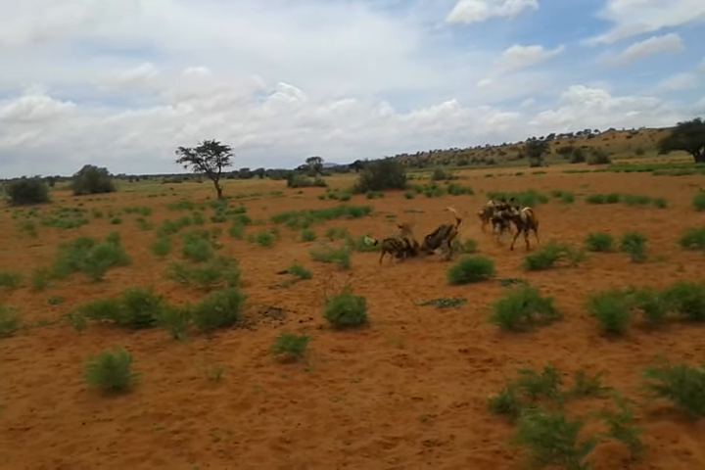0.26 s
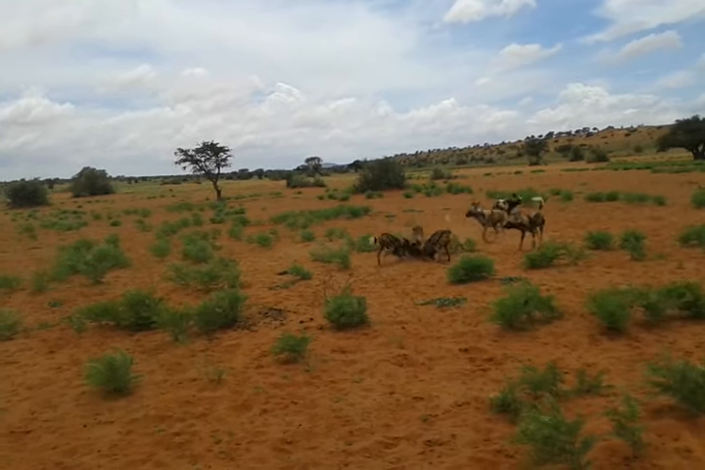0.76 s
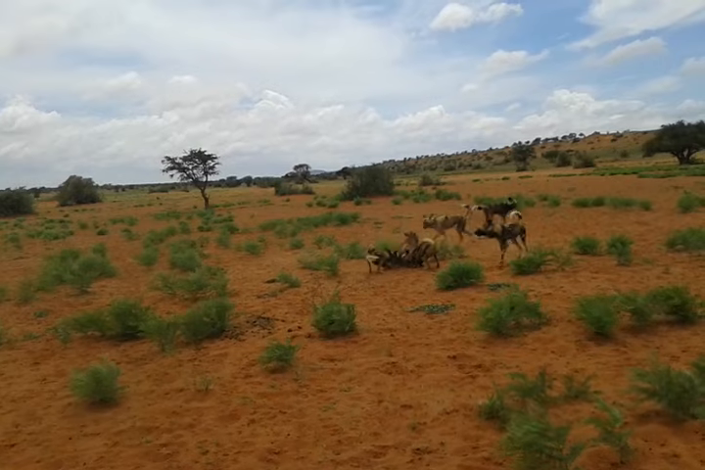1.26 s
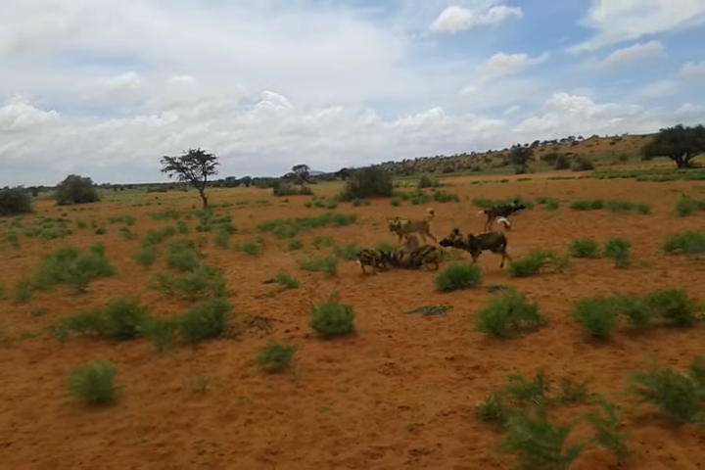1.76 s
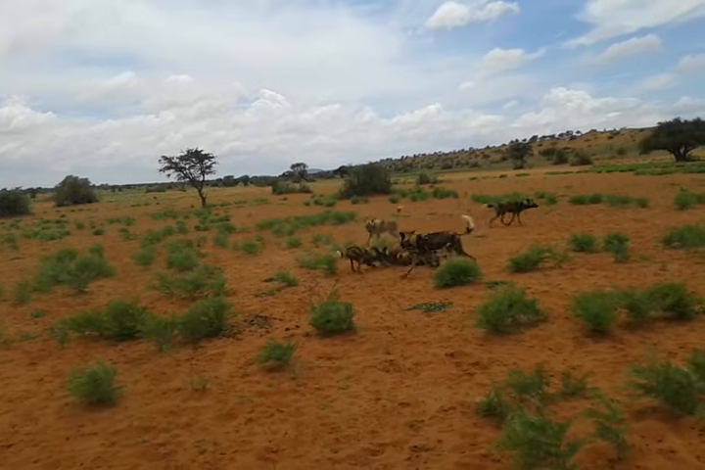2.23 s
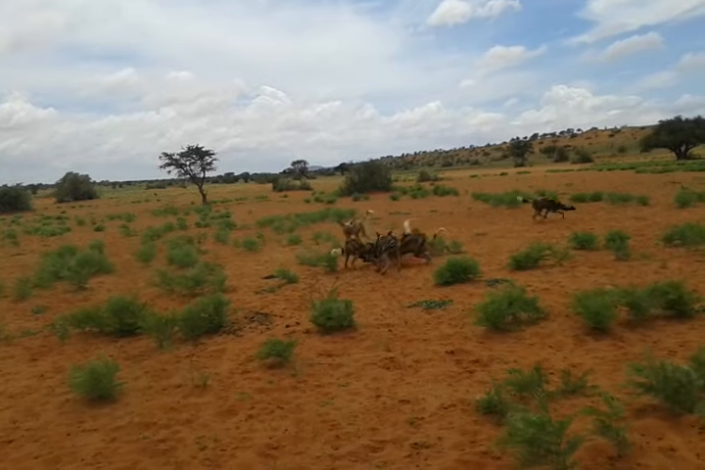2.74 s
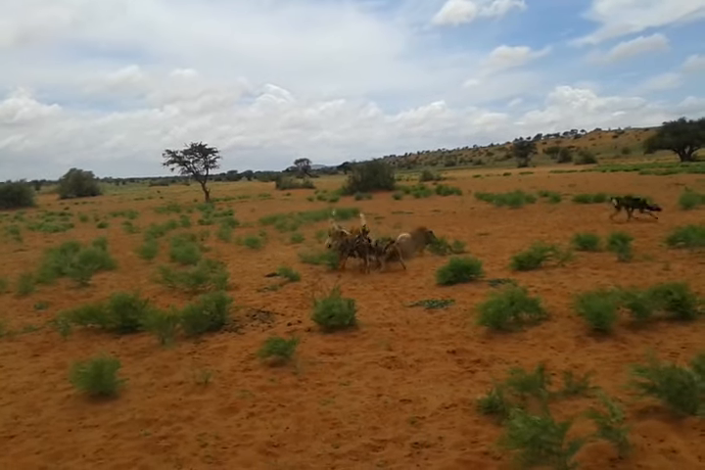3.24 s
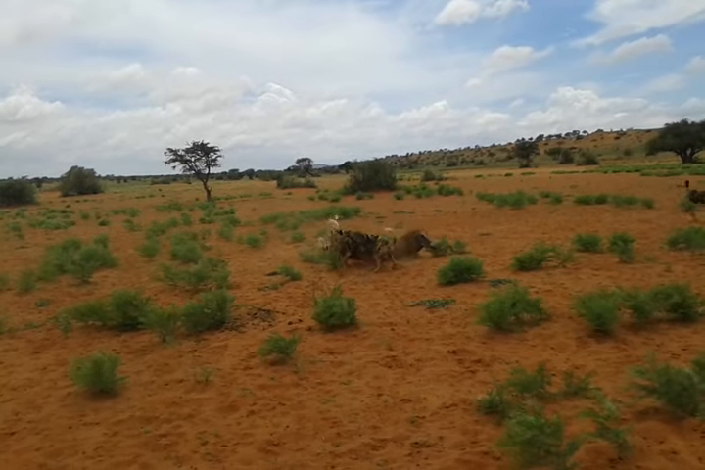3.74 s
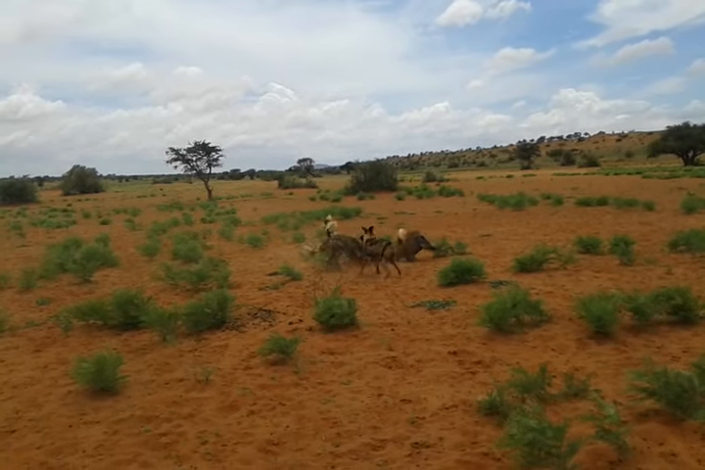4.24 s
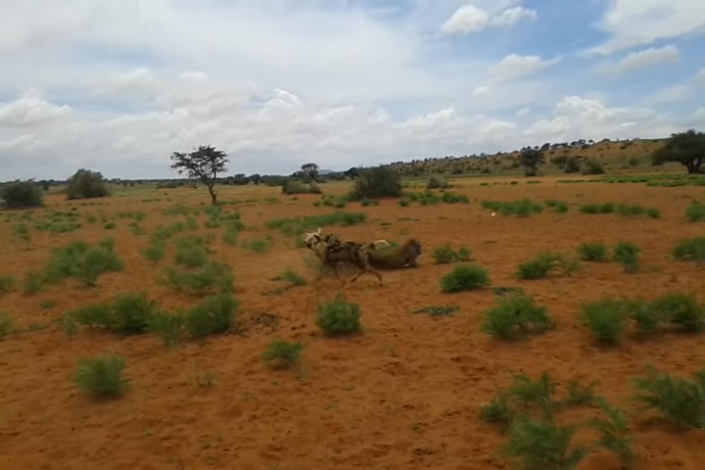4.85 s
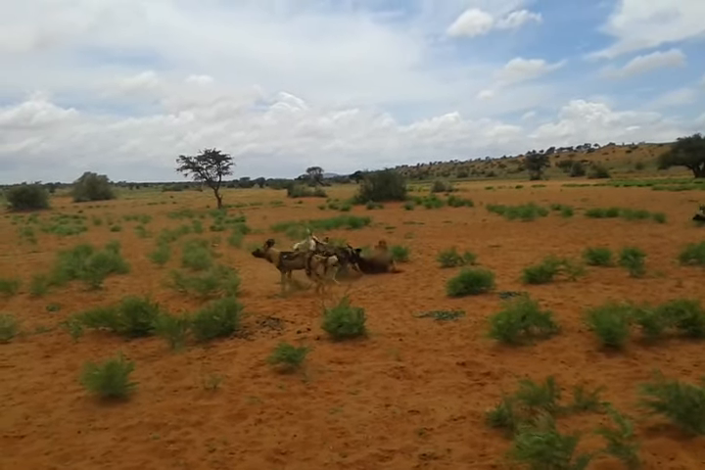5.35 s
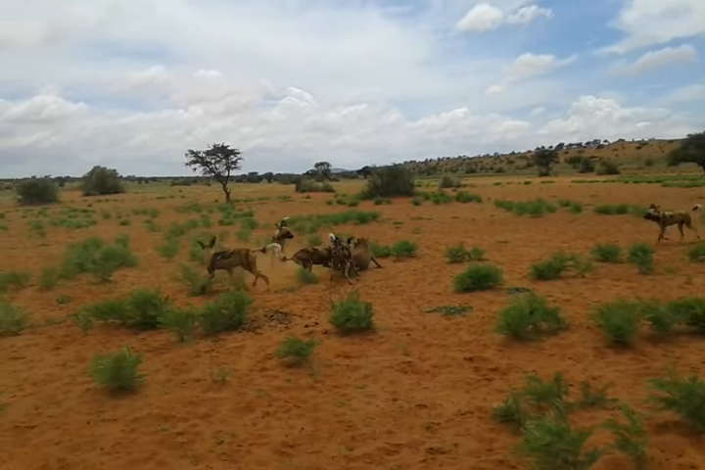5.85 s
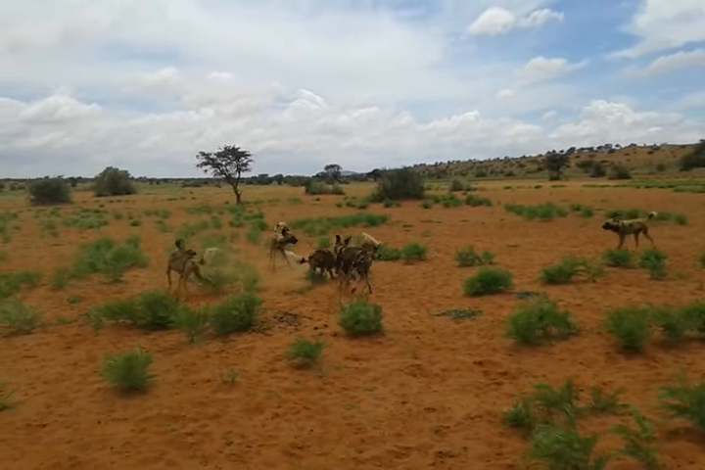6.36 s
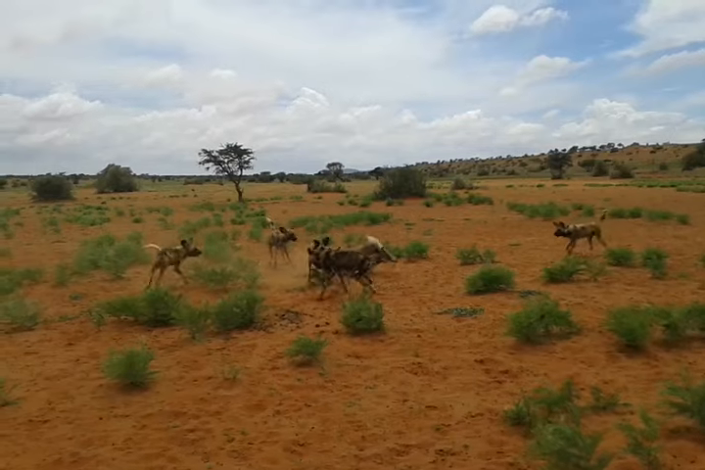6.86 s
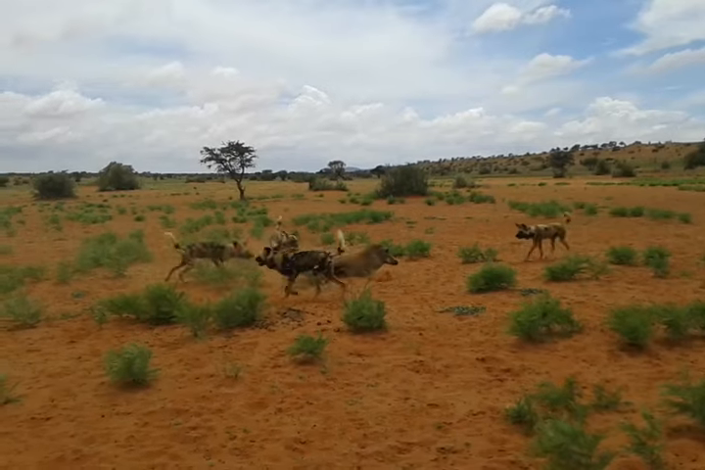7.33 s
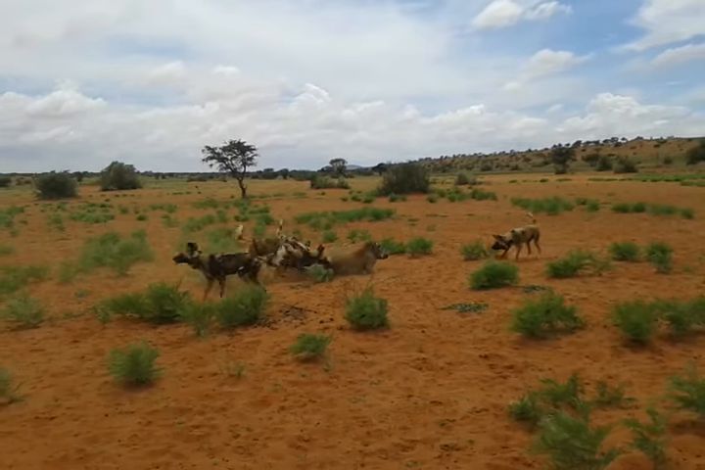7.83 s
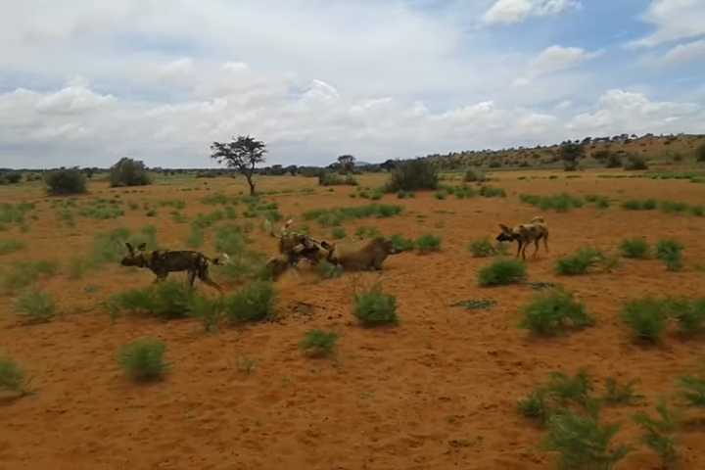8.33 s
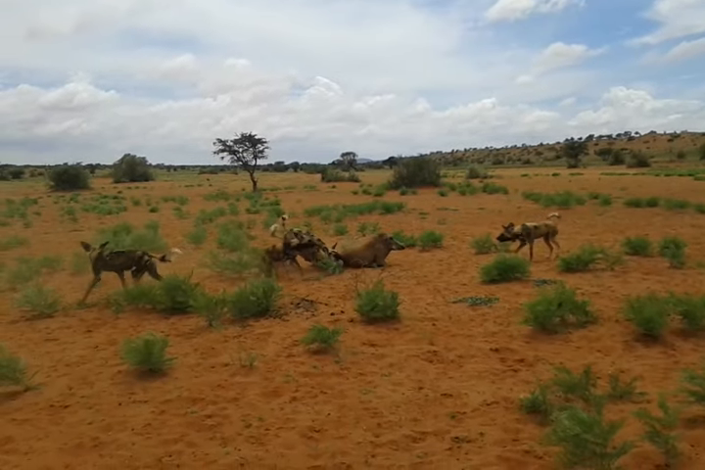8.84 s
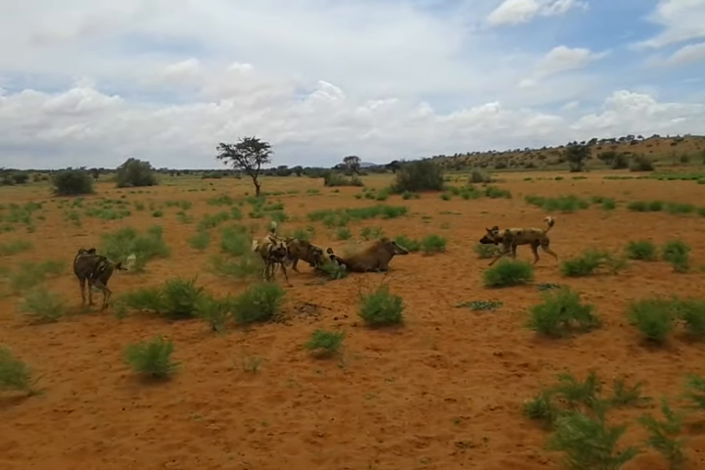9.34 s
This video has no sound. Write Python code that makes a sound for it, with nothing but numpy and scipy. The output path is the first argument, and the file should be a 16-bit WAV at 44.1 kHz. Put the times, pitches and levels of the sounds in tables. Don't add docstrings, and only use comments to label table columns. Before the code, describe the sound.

A warthog held at bay by wild dogs on open scrub grunts from the start, about five times a second: short, guttural slaps, single, double or triple, with a hollow ringing throat and changing mouth shape. Breath puffs follow the harder ones. Low wind rumbles and gusts on the microphone throughout, with a sharp buffet and a twig snap near 4.3 seconds. From about 4.7 to 5.3 the animal squeals once, a fluttering, raspy whistle rising near two kilohertz over a low tone, ending amid the heaviest wind thumps. Grunts resume at 5.4, loudest around 6.5 and 6.9, then 7.8, spreading out after 8. Faint thin chirps come near 1, 3 and 8.8, slight rustles at 2, 6.5 and 9.1, small snaps at 6.2, 8.1 and 9.1. A soft last grunt comes at 9.2, leaving breeze and light hiss. Echoes are short and dull.

```python
import sys
import numpy as np
from scipy import signal
from scipy.fft import rfft, irfft, next_fast_len
from scipy.io import wavfile
from scipy.ndimage import uniform_filter1d

SR = 44100
rng = np.random.default_rng(int(sys.argv[2]) if len(sys.argv) > 2 else 0)


def bounce(signal):
    frames = np.transpose(np.atleast_2d(signal))
    limited = np.clip(frames, -1, 1)
    pcm = np.round(limited * 32767).astype(np.int16)
    wavfile.write(sys.argv[1], SR, pcm)


def decibels_to_gain(level_db):
    exponent = np.asarray(level_db, float) / 20
    return 10 ** exponent


N = 422919
TIME = np.arange(N) / SR

# f/Hz, level/dB, t60/s
TRACT = [(411.4, -5.5, 0.082), (526, -7.5, 0.062), (695.4, 2.5, 0.11), (944, 1.5, 0.067),
         (1160, 4.5, 0.039), (1486, -1, 0.061), (1890, -1.5, 0.056), (2270, -3.5, 0.052),
         (2600, -5.5, 0.052), (3008, -3, 0.052), (3400, -5.5, 0.048), (3770, -6.5, 0.049),
         (4600, -14, 0.035), (5300, -18, 0.03)]
# t/s, length/s, first pulse level/dB, swell to last pulse/dB, mouth level re first pulse/dB
NARROW = [(0.128, 0.026, -38.5, -7.5, -24.5), (0.686, .021, -29, 4, -21), (1.306, .026, -34.5, 3.5, -15),
          (1.416, 0, -52, 0, -3.5), (1.503, 0, -33, 0, -20), (1.53, .023, -27, 1, -20),
          (1.556, .024, -31, -1, -26), (6.451, 0, -28, 0, -22), (1.97, .056, -40, -3, -17),
          (2.438, 0.05, -41.5, 4, -12.5), (5.454, 0, -35.5, 0, -13), (7.532, 0, -42.5, 0, -27),
          (8.276, 0, -29, 0, -24)]
ROUND = [
    (0.889, .026, -30.5, -1, -17),
    (2.047, .022, -52, 0, -3),
    (8.545, 0, -54, 0, -4),
    (2.88, .028, -40, 2.5, -14),
    (3.528, .051, -35, 0, -12),
    (5.835, .028, -32, -1, -8),
    (5.929, 0, -44, 0, -4),
    (6.48, 0, -20, 0, -17),
    (6.266, .029, -30.5, -5.5, -14),
]
WIDE = [
    (0.296, .033, -41, 1.5, -17),
    (1.113, .021, -43, 7.5, -12.5),
    (1.73, .031, -34, -8.5, -19.5),
    (3.083, .031, -42, 4, -7),
    (3.321, .026, -40, -3, -11),
    (8.062, .056, -44, 5, -15.5),
]
GAPING = [
    (5.427, 0, -28, 0, -22),
    (5.618, .026, -32, -2, -5),
    (6.888, .028, -19, -5, -18),
]
RAISED = [
    (6.032, .024, -38, 10, -13),
    (7.764, .028, -22, -7.5, -18),
]
FALSE_STARTS = [
    (3.665, 0, -46, 0, -12),
    (0.867, 0, -54, 0, -17),
    (4.412, 0, -45, 0, -10),
    (4.642, 0, -47, 0, -17),
    (5.405, 0, -38.5, 0, -27),
    (6.658, 0, -38, 0, -26),
    (6.865, 0, -51, 0, -10),
    (7.734, 0, -50, 0, -12),
]
TENSE = [
    (2.669, 0, -31.5, 0, -19),
    (3.934, .028, -39, 2.5, -12),
    (4.218, 0, -38.5, 0, -13),
    (4.437, .031, -30, -4, -16),
    (4.659, .052, -31, -12, -17),
    (6.432, .023, -37.5, 13, -15),
    (9.122, .021, -46, 6, -20),
]
NASAL = [
    (4.258, 0, -32, 0, -26),
    (6.681, .025, -24, -7, -25),
    (9.19, 0, -42, 0, -24),
]
PINCHED = [
    (0.511, 0, -39, 0, -25),
    (7.108, .029, -39, 0.5, -17),
    (7.317, .024, -40.5, 2, -14),
]
CLOSING = [
    (0.726, 0, -30, 0, -10),
    (1.047, 0, -50, 0, -2),
    (8.335, 0, -48, 0, -6),
    (2.7, 0, -50, 0, -8),
    (5.474, 0, -36, 0, -4),
    (5.671, 0, -31, 0, -6),
    (6.085, 0, -45, 0, -3),
    (6.728, 0, -47, 0, -4),
    (8.309, 0, -49, 0, -4),
]
# grunts, mouth f/Hz, snout f/Hz, snout level re mouth/dB
MOUTH_SHAPES = [
    (NARROW, 700, 1430, -4),
    (ROUND, 935, 1530, -6),
    (WIDE, 890, 2750, -1),
    (GAPING, 1150, 1900, -7),
    (RAISED, 945, 1950, -3),
    (FALSE_STARTS, 680, 1420, -6),
    (TENSE, 930, 1390, 4),
    (NASAL, 700, 1870, 10),
    (PINCHED, 1150, 2750, 6),
    (CLOSING, 694, 1500, -15),
]
PULSE_GAP_S = 0.027
MOUTH_FOLLOWS, MIDDLE_DB = 0.37, 3
# t/s, length/s, level/dB, tilt/(dB per octave), favoured f/Hz
PUFFS = [(0.716, 0.068, -49, -4.5, 1910), (1.53, 0.088, -43.5, -8, 716), (1.981, 0.2, -56, -6.5, 1630),
         (3.548, 0.068, -65, 1.5, 1890), (3.688, 0.086, -50.5, -7.5, 1045),
         (4.203, 0.089, -46.5, -8.5, 2130), (4.432, 0.12, -57.5, -4, 700),
         (5.641, 0.058, -35.5, -11.5, 700), (5.297, 0.13, -56.5, -5, 2010), (6.073, 0.074, -47.5, -9, 700),
         (6.489, 0.06, -39, -2.5, 2620), (6.704, 0.066, -48, -7, 700), (6.922, 0.057, -39, -8, 1900),
         (7.776, 0.074, -43.5, -8, 2180), (8.272, 0.12, -59.5, -6, 3660), (8.399, .2, -56.5, -7.5, 2780),
         (9.115, 0.13, -60, -4, 1400), (2.68, .07, -53, -8, 1900), (2.91, .06, -55, -9, 550),
         (3.125, .055, -54, -8, 2900), (3.35, .05, -56, -8, 3700), (2.49, .05, -54, -9, 700),
         (0.92, .06, -52, -9, 550), (1.135, .05, -54, -8, 2700), (1.335, .05, -52, -9, 550),
         (7.345, .055, -53, -8, 1150), (8.59, .1, -59, -8, 700), (4.705, .06, -52, -8, 700),
         (2.125, .035, -60, -2, 2200)]
GLIDE_SHARE, GLIDE_PER_S = 0.06, 9
# start t/s, end t/s
SQUEAL_SPAN = (4.7, 5.34)
# t/s, f/Hz, level/dB, second partial level/dB
WHISTLE = [
    (4.752, 1655, -49, -49.5),
    (4.815, 1770, -46.5, -43),
    (4.865, 1950, -35.5, -38.5),
    (4.93, 1972, -44, -45.5),
    (5.13, 2050, -36, -58),
    (5.142, 2175, -38, -54.5),
    (5.2, 2145, -35, -55),
    (5.235, 2085, -45, -50.5),
    (5.3, 1940, -43, -62),
]
# t/s, f/Hz, level/dB
LOW_TONE = [
    (4.78, 301, -54),
    (4.815, 420, -37.5),
    (4.86, 372, -43),
    (4.935, 434.4, -51),
    (4.965, 490.6, -41),
    (5.12, 472, -37.5),
    (5.2, 483, -41),
    (5.235, 519, -40.5),
    (5.3, 460, -42.5),
]
# t/s, f/Hz, side lines re partial/dB, own harmonics level/dB
FLUTTER = [
    (4.74, 141, -20, -62),
    (4.84, 140, -19, -62),
    (4.88, 138, -9, -62),
    (4.96, 140, -12, -63),
    (5.02, 139, -20, -63),
    (5.08, 157, -24, -62),
    (5.18, 158, -22, -61),
    (5.23, 172, -20, -55),
    (5.3, 157, -19, -57),
]
# multiple, level/dB
FLUTTER_ORDERS = [(2, 6), (4, -6), (5, 2), (6, -2), (7, -8), (8, -5), (9, -3), (10, 0), (11, -7)]
# f/Hz, level/(dB per Hz)
RASP = [(150, -62), (250, -17.5), (456, -4), (616, -24.5), (763, -12), (1020, -22), (1860, -17),
        (2050, -15.5), (2670, -29.5), (4200, -29.5), (5000, -45), (6500, -62), (11000, -120)]
SCOOP_S, SCOOP_SHARE = 0.027, 0.3
SCOOP_DULL_DB = 30
THIRD_DB, THIRD_FADE_DB_PER_S = -5.5, 9.0
BLUR_DB, BLUR_FOLLOWS = -7.5, 0.64
RASP_DB, RASP_FOLLOWS = -48.5, 0.3
BEAT_DEPTH = 0.2
SIDE_LOSS_DB, BELOW_DB = 3.5, -9
# t/s, peak level/dB
SNAPS = [
    (4.2572, -40),
    (6.2023, -50),
    (8.1179, -46),
    (8.1404, -48),
    (9.0114, -59),
    (9.1242, -48),
    (9.1436, -49),
    (9.191, -42),
]
SNAP_T60_S = 0.03
# t/s, length/s, level/dB
RUSTLES = [
    (1.97, .17, -72),
    (6.47, .06, -70),
    (9.1, .12, -67),
]
# t/s, length/s, start f/Hz, end f/Hz, level/dB
CHIRPS = [
    (1.045, .03, 3700, 3550, -63),
    (3.025, 0.042, 6600, 8000, -62.5),
    (3.272, .025, 8200, 9000, -63.5),
    (8.756, 0.028, 10000, 12600, -62),
    (8.782, 0.031, 5800, 9500, -58),
]
# t/s, level/dB
BREEZE = [(0.0, -58.5), (1.2, -50), (1.7, -58.5), (2.24, -57), (2.33, -72), (3.9, -63), (4.15, -56.5),
          (4.9, -57), (5.7, -45), (6.75, -48.5), (7.05, -66), (7.65, -47), (8.0, -69), (8.6, -46.5),
          (8.86, -54), (9.1, -47), (9.25, -61.5), (9.5, -53.5)]
# peak t/s, level/dB, time to change by 10 dB/s
GUSTS = [(.31, -43, 0.07), (.52, -47.5, .1), (.73, -42.5, 0.04), (.92, -49, 0.07), (1.31, -41.5, 0.08),
         (1.54, -50, 0.12), (2.01, -42, 0.1), (2.49, -39.5, .025), (2.63, -39.5, 0.0843),
         (2.92, -44.5, 0.05), (3.13, -41.5, 0.06), (3.37, -50.5, 0.12), (3.56, -43.5, 0.08),
         (3.97, -47, 0.05), (4.28, -36, .08), (4.51, -42, .08), (4.7, -44, .09), (5.33, -42, .07),
         (5.52, -37, 0.09), (5.899, -32, 0.05), (6.07, -46, 0.02), (6.31, -37, 0.07), (6.47, -41.5, 0.06),
         (6.92, -39.5, .07), (7.13, -44, 0.04), (7.36, -40.5, 0.04), (7.56, -43.5, .15), (7.78, -39.5, .06),
         (8.09, -51.5, 0.08), (8.28, -40, 0.0545)]
# t/s, peak level/dB, f/Hz
THUMPS = [(0.45, -28, 98), (1.289, -31.5, 72.7), (2.579, -38, 107), (4.265, -20.5, 168), (4.279, -24, 125),
          (4.354, -26.5, 116), (4.358, -21, 337), (4.474, -30, 133), (5.266, -17.5, 150), (5.277, -15, 124),
          (5.51, -23, 124), (5.7, -21.5, 120), (5.768, -27, 143), (5.887, -33, 160.2), (6.215, -30, 105),
          (6.298, -34, 140), (6.447, -27, 171), (6.828, -29.5, 86.1), (6.851, -31, 128),
          (7.126, -29.5, 175), (7.344, -34, 172), (7.462, -33.5, 94.5), (7.563, -37, 137),
          (7.755, -27, 160), (8.265, -28, 168), (8.459, -34.5, 102)]
# f/Hz, level/(dB per Hz)
WIND = [(20, -39), (35, -15.5), (50, -10.5), (80, -2), (120, -1.5), (170, -4), (220, -9.5), (300, -16)]
# f/Hz, level/(dB per Hz)
UPPER_WIND = [(150, -49), (220, -8), (330, -1), (500, -10.5), (800, -14), (1500, -26), (3000, -31.5)]
# f/Hz, level/(dB per Hz)
HISS = [(350, -12.5), (600, -8), (641, -18), (1060, -17.5), (1140, -8), (5060, -11), (13400, -11.5),
        (13900, -7.5)]


def rms_one(x):
    return x / np.sqrt(np.mean(x ** 2) + 1e-20)


def in_time(rows):
    s, *columns = np.transpose(rows)
    return [np.interp(TIME, s, column) for column in columns]


def gate(start, end, rise, fall):
    return np.clip((TIME - start) / rise, 0, 1) * np.clip((end - TIME) / fall, 0, 1)


def coloured(points):
    hz, db = np.transpose(points)
    size = next_fast_len(N)
    axis = np.maximum(np.fft.rfftfreq(size, 1 / SR), 1)
    shape = decibels_to_gain(np.interp(np.log(axis), np.log(hz), db, left=-90, right=-90))
    return rms_one(irfft(rfft(rng.standard_normal(size)) * shape, size)[:N])


def filtered(x, order, hz, kind="low"):
    return signal.sosfilt(signal.butter(order, hz, kind, fs=SR, output="sos"), x)


def drift(rate, size=N):
    r = np.exp(-16 * np.pi * rate / SR)
    slow = signal.lfilter([1], [1, -2 * r, r * r], rng.standard_normal(size // 8 + 602))[600:]
    return np.interp(np.arange(size) / 8, np.arange(len(slow)), rms_one(slow - slow.mean()))


def ring(drive, hz, t60):
    r, w = decibels_to_gain(-60 / (t60 * SR)), 2 * np.pi * hz / SR
    return signal.lfilter([0, np.sin(w)], [1, -2 * r * np.cos(w), r * r], drive + 1e-18)


def cycle(hz):
    return 2 * np.pi * np.cumsum(hz) / SR


def fold_slaps():
    rows = []
    for table, mouth_hz, snout_hz, snout_db in MOUTH_SHAPES:
        for start, length, first_db, swell_db, mouth_db in table:
            for place in np.linspace(0, 1, 1 + round(length / PULSE_GAP_S)):
                peak_db = first_db + swell_db * place + 4 * MIDDLE_DB * place * (1 - place)
                upper_db = first_db + mouth_db + MOUTH_FOLLOWS * swell_db * place - peak_db
                at = start + length * place
                rows.append((at, peak_db, upper_db, mouth_hz, upper_db + snout_db, snout_hz))
    return rows


def grunts():
    slaps = fold_slaps()
    rest_hz, level_db, t60 = np.transpose(TRACT)[:, :, None]
    zone = np.searchsorted([600, 1300], rest_hz)
    chance = rng.standard_normal((len(slaps), 3, len(TRACT), 1))
    flutter = np.array([0.18 * drift(70), 0.4 * drift(110), 0.6 * drift(200)])
    crackle = filtered(rng.standard_normal(N), 2, [2400, 5500], "band")
    t = np.arange(int(0.14 * SR)) / SR
    out = np.zeros(N)
    for slap, (detune, vary, phase) in zip(slaps, chance):
        start, peak_db, mouth_db, mouth_hz, snout_db, snout_hz = slap
        hz = rest_hz * (1 + 0.035 * detune)
        for favoured_hz in (mouth_hz, snout_hz):
            hz[np.argmin(np.abs(rest_hz - favoured_hz))] = favoured_hz
        mouth = mouth_db - np.minimum(41.0 * np.abs(np.log2(hz / mouth_hz)), 14)
        snout = snout_db - np.minimum(22.0 * np.abs(np.log2(hz / snout_hz)), 10.5)
        zone_db = np.choose(zone, [0 * hz, mouth, snout])
        gain = decibels_to_gain(peak_db + zone_db + level_db + 0.5 + 2.3 * vary)
        rise = 1 - np.exp(-t * np.sqrt(hz) / 0.05)
        at = int(start * SR)
        span = slice(at, at + len(t))
        rough = 1 + 1.48 * (1 - np.exp(-t / 0.0059)) * flutter[zone[:, 0], span]
        tones = decibels_to_gain(-60 * t / t60) * np.sin(2 * np.pi * hz * t + 0.3 * phase)
        out[span] += np.sum(gain * rise * rough * tones, axis=0)
        out[span] += decibels_to_gain(peak_db + snout_db - 15 - 60 * t / 0.12) * crackle[span]
    return out


def puffs():
    turbulence = rng.standard_normal(N) * decibels_to_gain(2.5 * drift(60))
    modes = [rms_one(ring(ring(turbulence, hz, 0.01), hz, 0.4 * t60)) for hz, _, t60 in TRACT]
    out = np.zeros(N)
    samples = np.arange(float(N))
    warped = np.cumsum(1 + GLIDE_SHARE * drift(GLIDE_PER_S)) % (N - 1)
    for start, length, level_db, tilt_db, favoured_hz in PUFFS:
        span = slice(int(start * SR), int((start + length) * SR))
        shape = gate(start, start + length, 0.011, 0.051)[span]
        for mode, (hz, _, _) in zip(modes, TRACT):
            favour_db = 9 * np.exp(-(np.log2(hz / favoured_hz) / 0.14) ** 2)
            mode_db = level_db - 6.5 + tilt_db * np.log2(hz / 400) + favour_db - 6.0 * (hz > 4000)
            out[span] += shape * np.interp(warped[span], samples, mode) * decibels_to_gain(mode_db)
    return out


def narrow(width_hz, size):
    return rms_one(filtered(rng.standard_normal(size), 5, width_hz))


def side_lines(flutter, side_db):
    n = len(flutter)
    total = 0
    for j in (-1, 1, 2, 3):
        line_db = side_db - SIDE_LOSS_DB * (abs(j) - 1) + BELOW_DB * (j < 0) + 5.0 * drift(25, n)
        total = total + decibels_to_gain(line_db) * np.exp(1j * j * flutter)
    return total


def squeal():
    span = slice(int(SQUEAL_SPAN[0] * SR), int(SQUEAL_SPAN[1] * SR))
    t, n = TIME[span], span.stop - span.start
    high_hz, one_db, two_db = (c[span] for c in in_time(WHISTLE))
    low_hz, low_db = (c[span] for c in in_time(LOW_TONE))
    flutter_hz, side_db, buzz_db = (c[span] for c in in_time(FLUTTER))
    scoop = np.clip((WHISTLE[0][0] - t) / SCOOP_S, 0, 1) ** 0.45
    high_hz = high_hz * (1 - SCOOP_SHARE * scoop)
    two_db = two_db - SCOOP_DULL_DB * scoop
    three_db = two_db + THIRD_DB - THIRD_FADE_DB_PER_S * (t - WHISTLE[2][0])
    blur_db = BLUR_DB - BLUR_FOLLOWS * (one_db + 42.5)
    high = cycle(high_hz * (1 + 0.0052 * drift(37, n)))
    low = cycle(low_hz * (1 + 0.014 * drift(42, n)))
    flutter = cycle(flutter_hz * (1 + 0.025 * drift(30, n)))

    buzz = 0
    for order, db in FLUTTER_ORDERS:
        buzz = buzz + decibels_to_gain(buzz_db + db + 4.0 * drift(20, n)) * np.sin(order * flutter)

    partials_db = [one_db, two_db - 1.5] + [three_db - loss for loss in (3.5, 5, 5.5, 8, 16)]
    clean_db = [0, -1.5, -14, -17, -18, -19, -20]
    width_hz = [130, 190, 330, 430, 520, 600, 650]
    whistle = 0
    for k, db in enumerate(partials_db):
        lines = 1 + (1 + 0.45 * k) * side_lines(flutter, side_db)
        clean = decibels_to_gain(clean_db[k] + 3.0 * drift(30, n)) * np.imag(lines * np.exp(1j * (k + 1) * high))
        blur = decibels_to_gain(blur_db - 1.5) * narrow(width_hz[k], n) * np.sin(1.065 * (k + 1) * high)
        whistle = whistle + decibels_to_gain(db) * (clean + blur)
    whistle = whistle * (1 + BEAT_DEPTH * np.cos(low))

    unsteady = decibels_to_gain(1.7 * drift(50.6, n)) + 0.26 * drift(65, n)
    harmonics = np.sin(low) + 0.11 * np.sin(2 * low) + 0.07 * np.sin(3 * low)
    tone = decibels_to_gain(low_db) * unsteady * harmonics * gate(4.78, 5.305, 0.015, 0.0074)[span]
    rasp_db = RASP_DB - 1.5 + RASP_FOLLOWS * (two_db + 48) + 1.5 * drift(40, n)
    out = np.zeros(N)
    out[span] = np.sqrt(2) * (whistle + buzz + tone) + decibels_to_gain(rasp_db) * coloured(RASP)[span]
    return out * gate(4.724, 5.32, 0.01, 0.03)


def scrub_echo(voice):
    dull = filtered(voice, 1, 2500)
    lags = (SR * np.sort(rng.uniform(0.02, 0.09, 7))).astype(int)
    return sum(decibels_to_gain(-24 - 120 * lag / SR) * np.r_[np.zeros(lag), dull[:-lag]] for lag in lags)


def snaps():
    t, out = np.arange(int(SNAP_T60_S * SR)) / SR, np.zeros(N)
    for start, peak_db in SNAPS:
        decay = decibels_to_gain(peak_db + 0.5 - 60 * t / SNAP_T60_S)
        out[int(start * SR):][:len(t)] += decay * rng.standard_normal(len(t))
    return filtered(out + 1e-18, 3, [600, 3800], "band")


def rustles():
    bright = filtered(rng.standard_normal(N), 2, 3500, "high") * decibels_to_gain(3.0 * drift(80))
    return bright * sum(decibels_to_gain(db) * gate(s, s + length, 0.4 * length, 0.4 * length) for s, length, db in RUSTLES)


def chirps():
    out, waver = np.zeros(N), 1 + 0.04 * drift(300)
    for start, length, start_hz, end_hz, level_db in CHIRPS:
        t = np.arange(int(length * SR)) / SR
        at = int(start * SR)
        span = slice(at, at + len(t))
        hz = (start_hz + (end_hz - start_hz) * (t / length) ** 1.8) * waver[span]
        out[span] += decibels_to_gain(level_db) * np.sin(np.pi * t / length) * np.sin(cycle(hz))
    return out


def gusts():
    coarse = TIME[::32]
    s, db, swell_s = np.transpose(GUSTS)[:, :, None]
    power = np.sum(decibels_to_gain(2 * (db - 10 * np.abs(coarse - s) / swell_s)), axis=0)
    return np.sqrt(np.interp(TIME, coarse, power) + decibels_to_gain(2 * in_time(BREEZE)[0]))


def wind():
    gust = gusts()
    lumps = decibels_to_gain(3.8 * drift(12))
    out = gust * decibels_to_gain(-0.3) * rms_one(lumps * coloured(WIND))
    upper = rms_one(lumps * decibels_to_gain(1.0 * drift(26)) * coloured(UPPER_WIND))
    out += gust ** 0.66 * decibels_to_gain(-33.5) * upper
    for start, peak_db, hz in THUMPS:
        t = np.arange(int(2.63 / hz * SR)) / SR
        at = int(start * SR)
        swell = np.sin(np.pi * t / t[-1]) ** 2
        out[at:at + len(t)] += decibels_to_gain(peak_db - 4.0) * swell * np.sin(2 * np.pi * hz * t)
    return out


def scene():
    pig = grunts() + puffs() + squeal()
    return (pig + scrub_echo(pig) + snaps() + rustles() + chirps() + wind())[None]


def roll_off(x):
    return signal.sosfilt(signal.butter(12, 14080, fs=SR, output="sos"), x)


def record(dry):
    level_db = 10 * np.log10(uniform_filter1d(dry ** 2, int(0.055 * SR), axis=1) + 1e-9)
    hiss_db = -70.0 + 0.27 * (np.clip(level_db, -70, -38) + 51.5)
    mix = dry + decibels_to_gain(hiss_db) * coloured(HISS)
    return roll_off(mix)


dry = scene()
out = record(dry)
bounce(out)
```